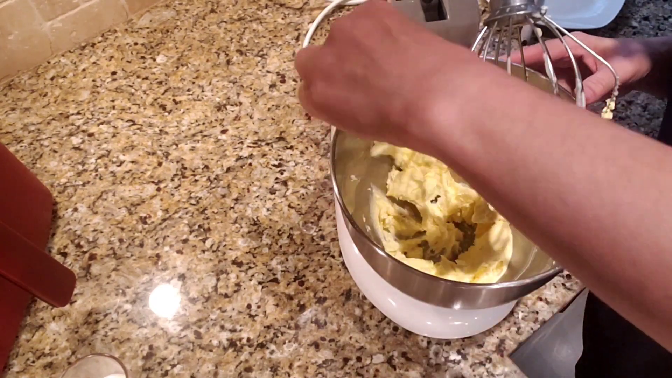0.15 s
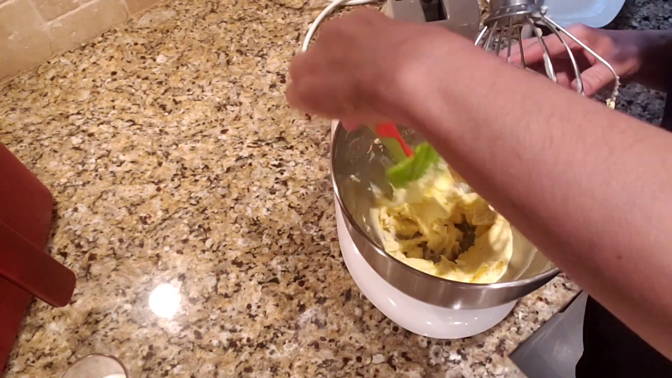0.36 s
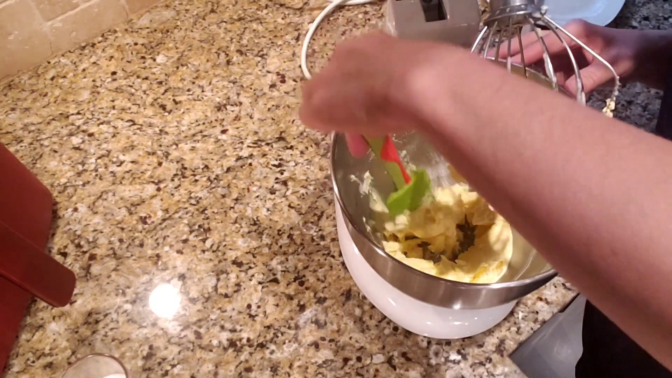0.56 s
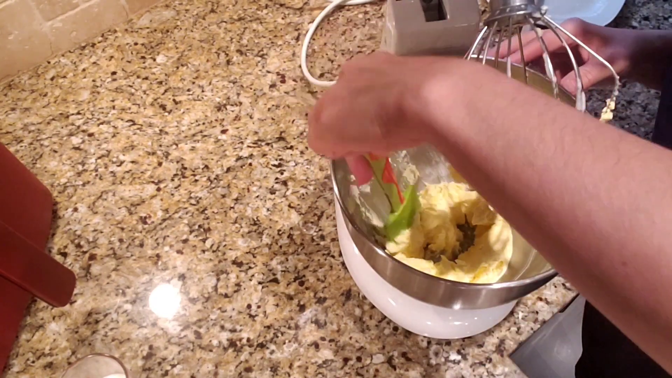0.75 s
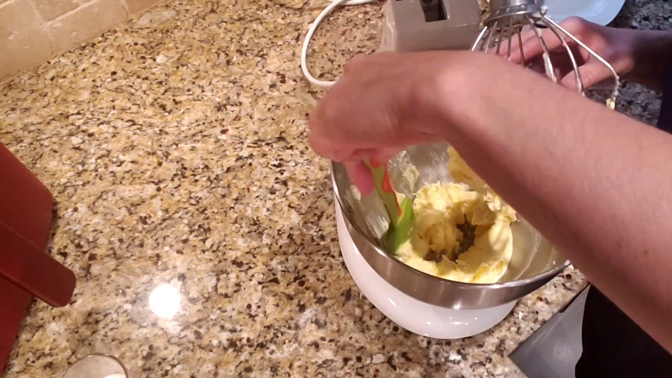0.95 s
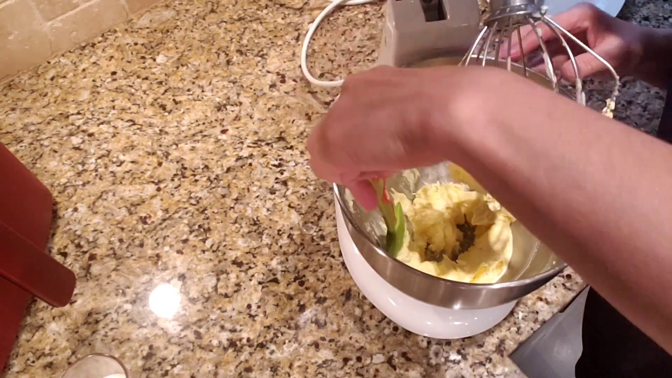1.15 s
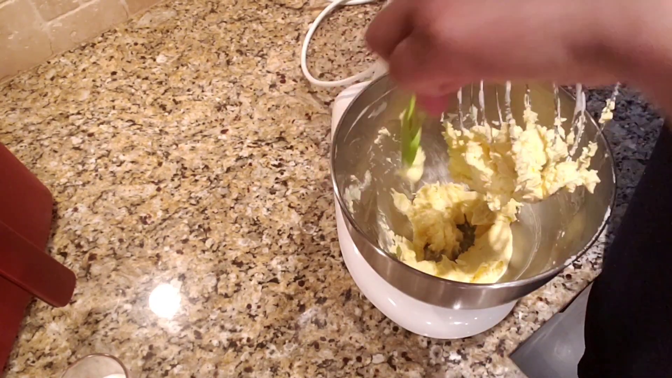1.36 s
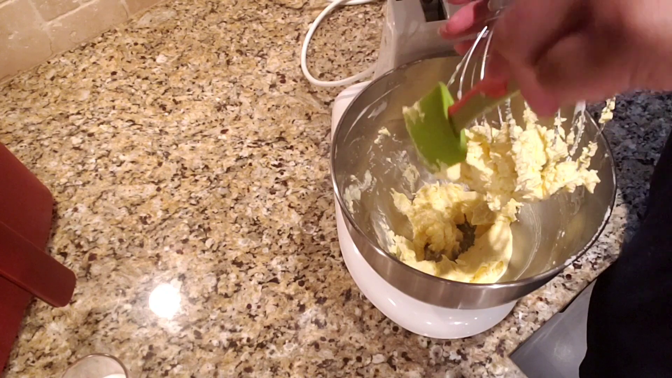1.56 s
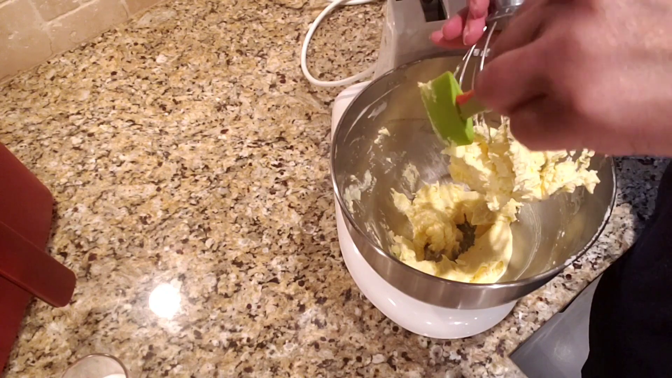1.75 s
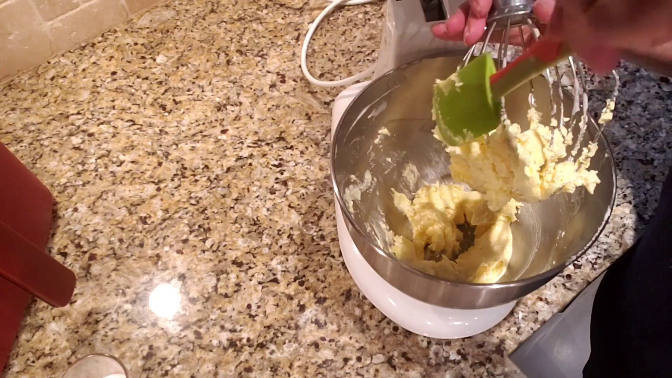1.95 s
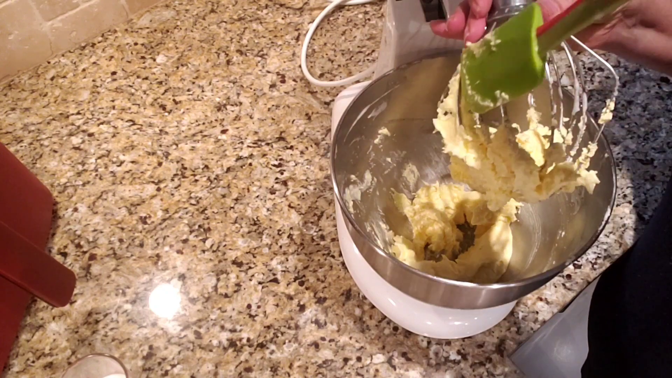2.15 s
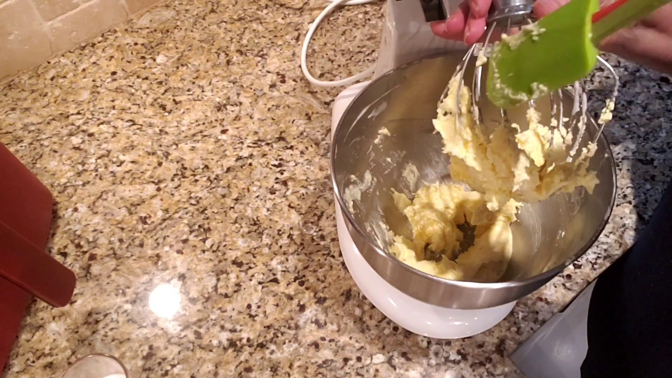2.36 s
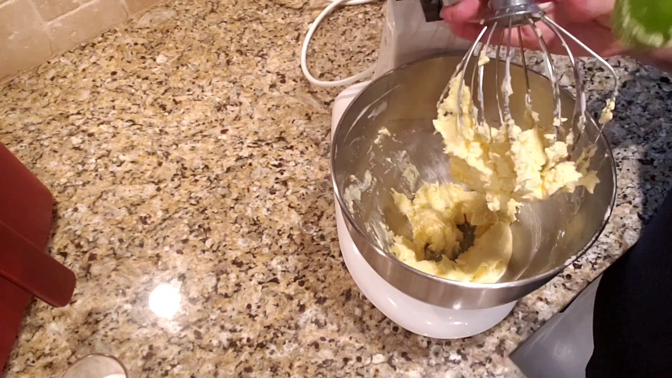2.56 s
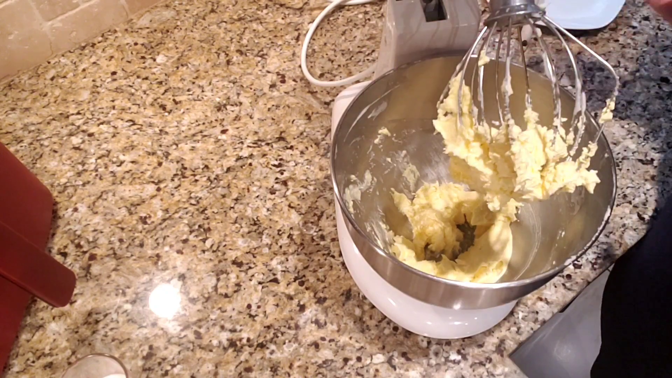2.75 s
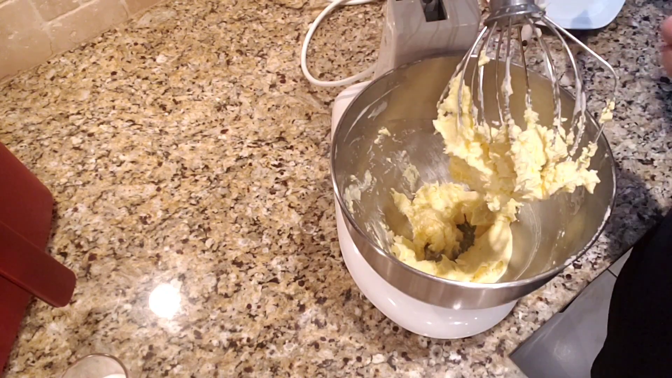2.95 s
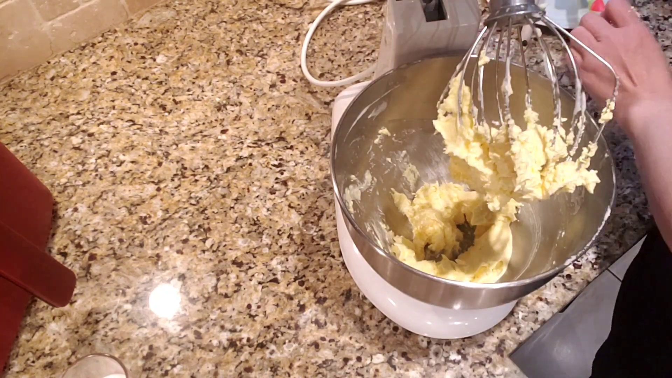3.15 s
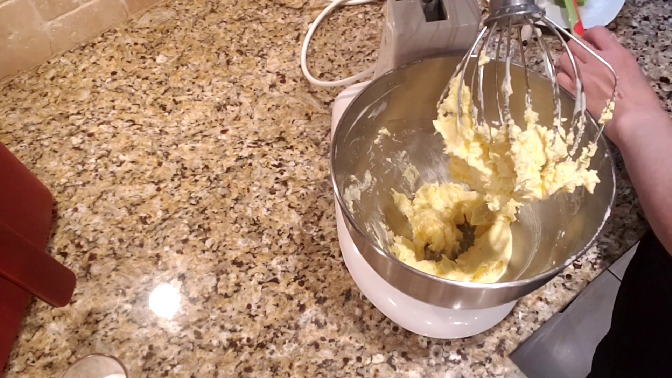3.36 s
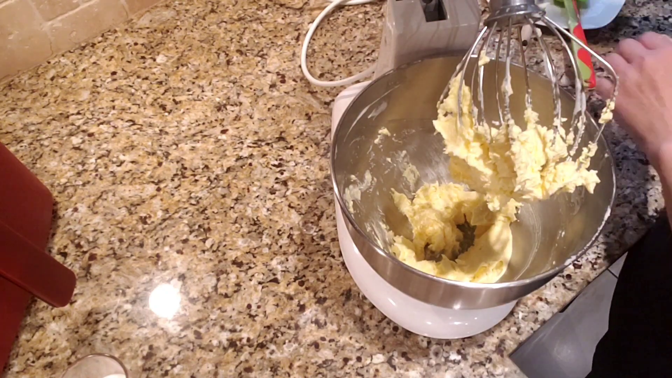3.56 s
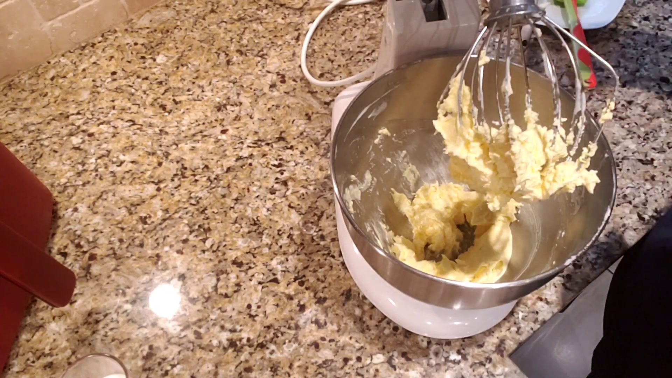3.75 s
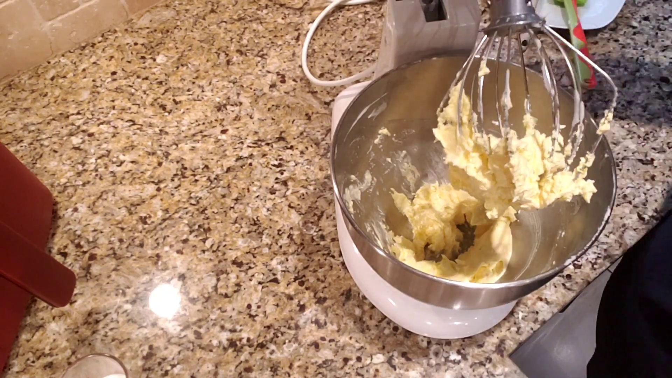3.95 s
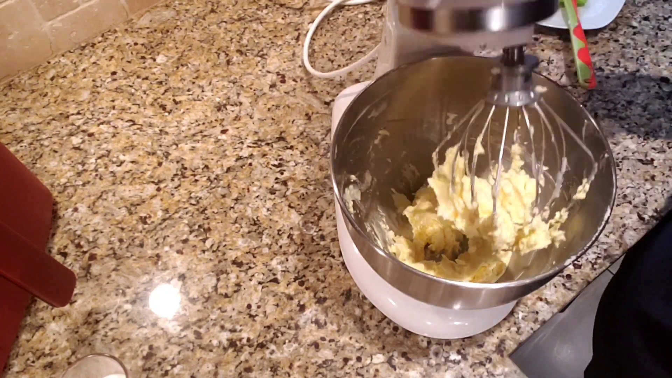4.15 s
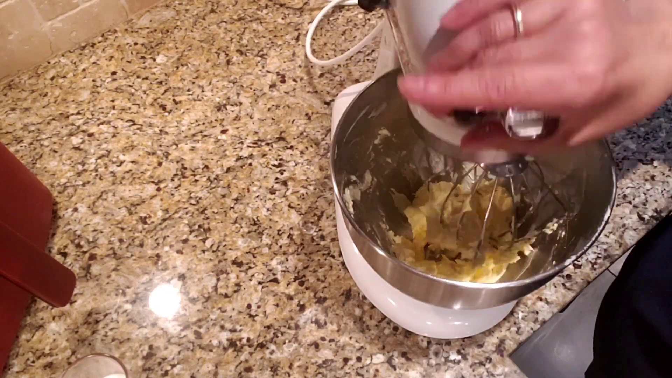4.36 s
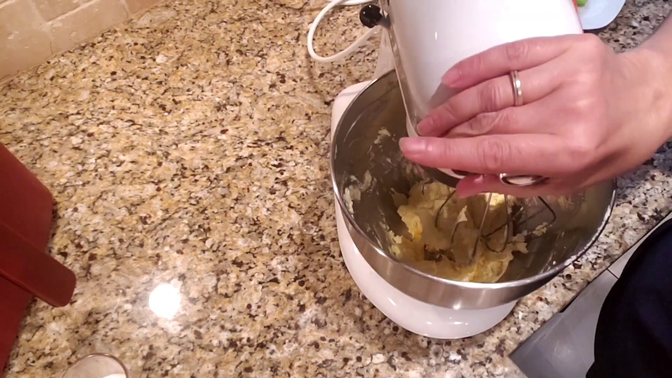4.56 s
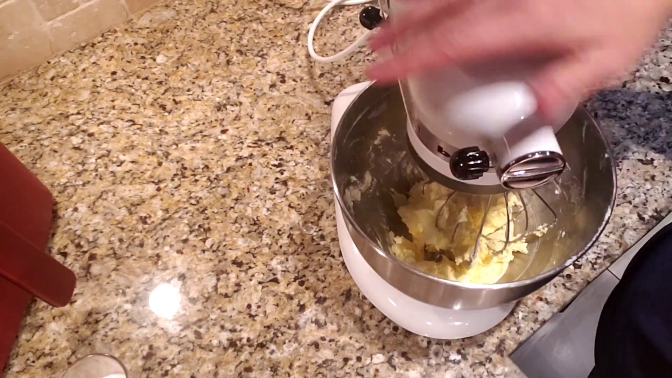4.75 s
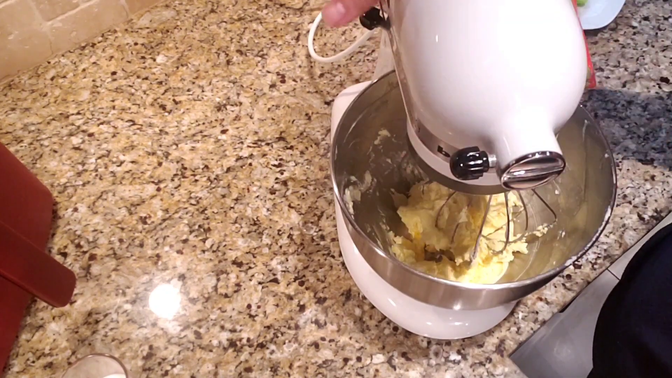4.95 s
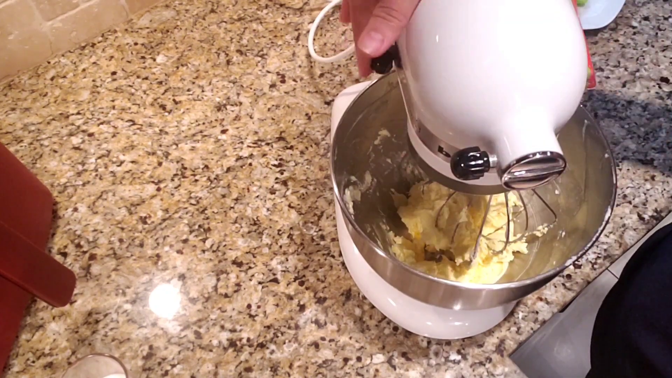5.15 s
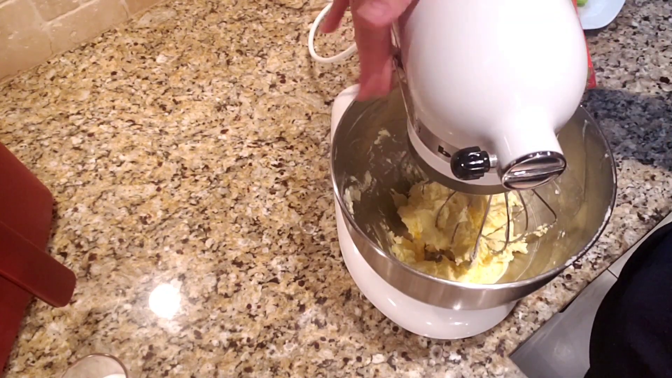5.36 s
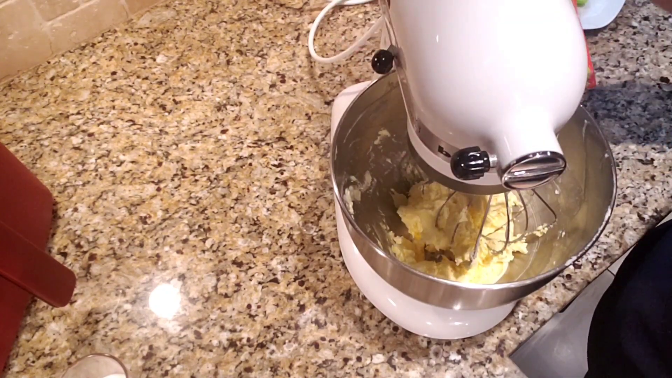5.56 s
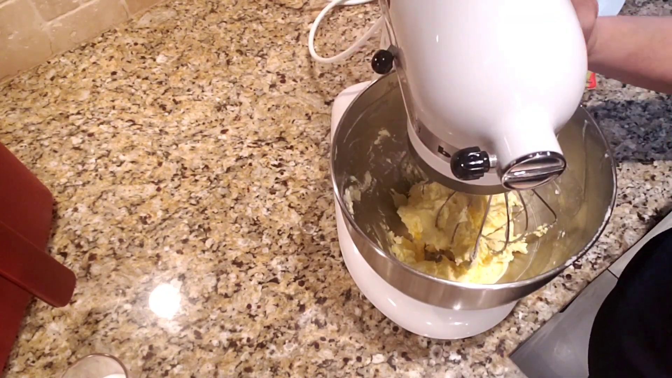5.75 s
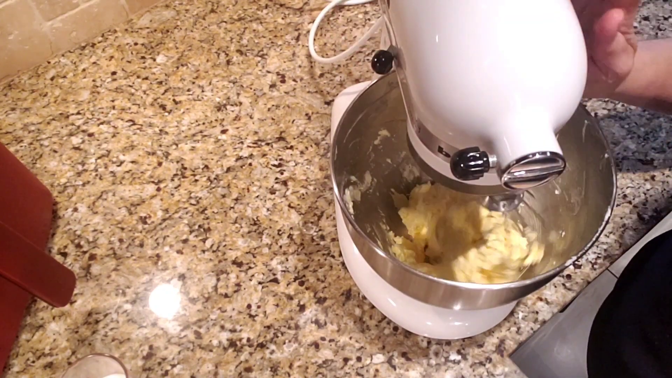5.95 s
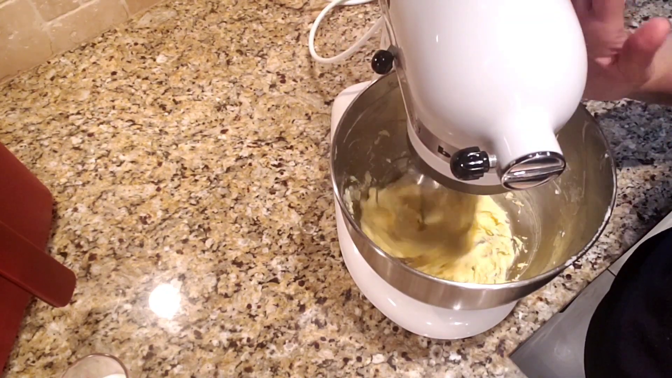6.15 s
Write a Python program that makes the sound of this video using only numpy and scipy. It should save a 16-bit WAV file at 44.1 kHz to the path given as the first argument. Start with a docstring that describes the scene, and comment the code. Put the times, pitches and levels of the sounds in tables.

```python
"""A spatula's friction scrapes butter round a resonant steel bowl in a kitchen where a fridge hums throughout.
Hands brush as swells of soft friction noise, and the spatula handle clatters on a dish that rings in decaying modes.
The head of the stand mixer is tilted down: its hinge groans in short tones, it lands with two thumps that rock
the stand, and the lock lever clicks as noise bursts through narrow resonances. At last the speed lever is pushed;
the motor snaps on and runs up, its whine a rising series of shaft orders over the hiss of the gears."""
import sys
import numpy as np
from scipy import signal
from scipy.fft import rfft, irfft
from scipy.io import wavfile

SR = 44100
rng = np.random.default_rng(int(sys.argv[2]) if len(sys.argv) > 2 else 0)


def waveform_to_disk(signal):
    """Save audio, clipped to [-1, 1], as 16-bit WAV at the path in sys.argv[1]."""
    frames = np.transpose(np.atleast_2d(signal))
    scaled = np.clip(frames, -1, 1) * 32767
    samples = np.round(scaled).astype(np.int16)
    wavfile.write(sys.argv[1], SR, samples)


N = 277375
TIME = np.arange(N) / SR  # s
AFTER = TIME[:SR]  # time since a blow, s

# spectrum of smeared butter and brushing skin: f/Hz, relative level per Hz/dB
SMEAR_SPECTRUM = [(1000, -50), (3500, -18), (4600, -8.5), (5500, -5), (7000, 0.5), (8200, -5.5),
                  (9500, -7.5), (11500, -2.5), (13500, 2), (15000, -5)]
# resonances of the steel bowl: f/Hz, width/Hz, relative level/dB
BOWL_RESONANCES = [(1240, 94, 0), (1326, 35, 1), (1833, 56, 10.5), (2320, 35, -4), (2340, 330, -7.5),
                   (2820, 39, -18), (3300, 46, -9), (3680, 570, -23), (4270, 120, 7), (4960, 84, 11.5),
                   (5236, 38, 16), (5760, 50, -27), (5740, 130, 11.5), (6500, 490, 7), (7170, 99, 14),
                   (7960, 230, 8)]
# resonances of the motor housing: f/Hz, width/Hz, relative level/dB
HOUSING_RESONANCES = [(395, 43, -12), (644, 23, 0), (850, 36, -5), (1890, 80, 1), (2074, 34, 3),
                      (3280, 50, 9.5), (3450, 61, 8), (6400, 40, 7.5), (7070, 140, 3.5), (7340, 40, -5),
                      (8440, 46, -5)]


def spatula():
    """Sliding friction: the rubber edge rasps on steel while butter smears and tears; both excite the bowl."""
    # rasp of the edge: f/Hz, relative level per Hz/dB
    rasp_spectrum = [(300, -2), (700, -1.5), (1200, -2), (1900, -4.5), (3000, 2), (4500, -4.5), (7000, -5),
                     (15000, -34)]
    hiss_gain, rasp_gain, travel = strokes()

    rasp = colour(friction(slips_per_s=800, spread_db=2, smooth=0.55), rasp_spectrum)
    rasp = amp(-5) * rasp + resonate(rasp, BOWL_RESONANCES)
    rasp = unit(wall_echo(rasp, travel)) * rasp_gain

    hiss = colour(friction(slips_per_s=2500, spread_db=3, smooth=0.8), SMEAR_SPECTRUM)
    hiss = hiss + amp(-17) * resonate(hiss, BOWL_RESONANCES)
    hiss = unit(wall_echo(hiss, travel)) * hiss_gain

    unevenness = amp(1.3 * drift(65))
    return kitchen((rasp + hiss) * unevenness, wet_db=-9)


def strokes():
    """Contact force shapes friction: each stroke lands, presses through an arch, wipes the steel and lifts off."""
    # t/s, length/s, butter hiss level/dB, extra hiss on landing/dB, extra hiss from pressure in mid-stroke/dB,
    # edge rasp level at the end/dB, rise of the rasp through the stroke as the steel is wiped bare/dB
    stroke_table = [(0, 0.17, -49.5, -11, 6.5, -53.5, 33), (0.356, 0.12, -39.5, 9, 4, -47, 6),
                    (0.612, 0.09, -41.5, -4.5, 3.5, -48.5, 8.5), (0.852, 0.099, -47.5, 3.5, 4, -52.5, 9.5),
                    (1.057, 0.099, -44, 8.5, 1, -49, 8.5), (1.275, 0.077, -49.5, 8.5, 2, -48.5, 17)]
    touch_s, landing_s = 0.007, 0.041  # linear onset; decay constant of the landing
    lift_db_per_s = 332
    hiss, rasp, travel = np.zeros((3, N))
    for s, length, hiss_db, landing_db, press_db, rasp_db, wipe_db in stroke_table:
        along = np.minimum(AFTER / length, 1)
        lift_off = amp(-lift_db_per_s * np.maximum(AFTER - length, 0))
        contact = np.minimum(AFTER / touch_s, 1) * lift_off
        landing = landing_db * np.exp(-AFTER / landing_s)
        pressure = press_db * np.sin(np.pi * along)
        add(hiss, s, contact * amp(hiss_db + landing + pressure))
        add(rasp, s, contact * amp(rasp_db - wipe_db * (1 - along)))
        moved = np.minimum((TIME - s) / length, 1) ** 2
        travel = np.where(TIME >= s, moved, travel)
    return hiss, rasp, travel


def wall_echo(x, travel):
    """Comb filtering: two echoes across the bowl carve bands that sink as the spatula's travel lengthens the lag."""
    echo_s, lengthening, strength = 0.00325, 0.1, 0.7  # lag at the start, its growth as a share, gain per crossing
    lag = echo_s * (1 + lengthening * travel)
    out = x.copy()
    for crossing in (1, 2):
        delayed = [np.interp(TIME - crossing * lag, TIME, channel) for channel in x]
        out += strength ** crossing * np.array(delayed)
    return out


def head():
    """Impact of a heavy body: the head clacks on its stop, rings dully and rocks the mixer; the bowl is bumped."""
    # t/s, thud on the counter level/dB, ring of the head level/dB, clack level/dB, clack bandwidth/Hz
    knocks = [(1.062, -47.5, -51.5, -82, 1770), (1.277, -49.5, -58.5, -54.5, 1800),
              (4.05, -60, -68, -43.5, 1600), (4.066, -39, -39.5, -44, 850), (4.128, -50, -46.5, -68, 696),
              (4.184, -44, -56, -53, 2760), (4.347, -51, -47, -63, 1170), (4.533, -42.5, -40.5, -46, 1300),
              (4.685, -23.5, -28, -29.5, 624), (4.722, -28.5, -32.5, -45, 2050),
              (4.795, -27.5, -30.5, -48.5, 1508), (4.801, -20.5, -24.5, -31.5, 490),
              (4.882, -41, -50.5, -75, 1400), (4.938, -44, -64.5, -80, 600),
              (5.049, -47.5, -46.5, -74.5, 600)]
    # modes of the cast head: f/Hz, relative level/dB, t60/s
    head_modes = [(351.4, 1.5, 0.22), (370.7, 1.5, 0.24), (455, 2, 0.058), (532.4, -11.5, 0.25),
                  (670, -25.5, 0.29), (877, -14.5, 0.052), (912, -17, 0.24), (1555, -14, 0.05)]
    out = np.zeros((2, N))
    thud = rocking()
    casting = unit_attack(ring(head_modes) * (1 - np.exp(-AFTER / 0.00073)))
    for s, thud_db, ring_db, clack_db, width_hz in knocks:
        corner_hz = max(width_hz, 360)
        softness = [(100, -10), (350, 0), (corner_hz, -2), (2 * corner_hz, -17), (16000, -50)]
        rattle = burst(t60=0.046) * (1 - np.exp(-AFTER / 0.0089))
        clack = unit_attack(colour(rattle, softness))
        add(out, s, amp(thud_db) * thud)
        add(out, s, amp(ring_db) * kitchen(casting, wet_db=-10.5))
        add(out, s, amp(clack_db) * kitchen(clack, wet_db=-3.5))
    return out


def rocking(cycles=1.7):
    """Mass on a springy support: the stand swings on the counter, each mode building up over a cycle or so."""
    # f/Hz, relative level/dB, t60/s
    stand_modes = [(49.2, -2, 0.15), (74.4, -18.5, 0.32), (97.9, -1, 0.13), (122, -7.5, 0.076)]
    swing = sum(ring([mode]) * (1 - np.exp(-AFTER * mode[0] / cycles)) for mode in stand_modes)
    return unit_attack(swing, size=2205)


def hinge():
    """Stick-slip: short groans at the pitch of the mixer body, each a tone with a trace of its octave."""
    # t/s, level/dB, length/s, f/Hz
    groans = [(1.967, -48, 0.033, 365.5), (4.342, -36, 0.041, 376), (4.385, -50, 0.039, 363),
              (4.426, -41, 0.042, 367.5), (4.471, -53.5, 0.032, 375)]
    out = np.zeros((2, N))
    for s, db, length, hz in groans:
        t = TIME[:round(length * SR)]
        groan = np.sin(2 * np.pi * hz * t) + amp(-38) * np.sin(2 * np.pi * 2 * hz * t)
        swell = np.sin(np.pi * t / length)
        add(out, s, amp(db) * unit(groan * swell))
    return kitchen(out, wet_db=-10)


def clicks():
    """Hard impact: a broadband crack, and a brief rough ring as the rattle excites a set of resonances."""
    # t/s, resonance set, crack level/dB, ring level/dB, tilt of the crack at 400 Hz/dB, at 1.8 kHz/dB,
    # at 12 kHz/dB, t60 of the rattle/s
    # The first three are bowl ticks under the spatula: in the first, a light metal tick, and the second,
    # a bright one, the set's name only chooses the ring and names no struck part.
    click_table = [(0.228, "hinge", -56.5, -61.5, 9, -4, 1, .02),
                   (1.061, "whisk", -45.5, -45.5, -20, -23, -4, 0.016),
                   (1.276, "bowl", -54, -42.5, 2, -25, -10, 0.034),
                   (3.9922, "whisk", -41.5, -40.5, -2, -9, -6, 0.0073),
                   (3.999, "whisk", -45.5, -43, 8, 1, -13, 0.043),
                   (4.059, "hinge", -60, -46, 19, 8, -18, 0.087),
                   (4.185, "hinge", -54.5, -46.5, 0, 14, -32, .06),
                   (4.528, "hinge", -69.5, -58.5, 0, 11, -6, 0.4),
                   (4.632, "whisk", -50, -62, 15, 14, -10, 0.15),
                   (4.665, "whisk", -37, -38.5, 8.5, -1.5, -4.5, 0.16),
                   (4.666, "hinge", -60, -46.5, 3.5, -3, -14, 0.0187),
                   (4.797, "hinge", -58, -43.5, 5, 2.5, -29, 0.021),
                   (4.811, "whisk", -52.5, -53, -12, -12, -5, 0.023),
                   (5.049, "lock", -35.5, -37, -13, -3.5, 3, 0.011),
                   (5.052, "lock", -39, -33.5, -11, 4, -2, 0.11),
                   (5.257, "switch", -57.5, -66.5, -3.5, 6, -9.5, 0.078),
                   (5.288, "switch", -51, -62, -23, 8.5, -11, 0.11),
                   (5.309, "switch", -27, -30.5, -27.5, -1.5, -5.5, 0.11),
                   (5.342, "switch", -25.5, -22, -8, -4.5, 1.5, 0.01),
                   (5.346, "switch", -29.5, -29, 6, 5.5, 0.5, 0.04),
                   (5.408, "switch", -54.5, -44, 0, -7, 2, .024),
                   (5.467, "switch", -65, -57, -0.5, -7.5, -3, 0.034),
                   (6.066, "gears", -19, -36, -10, -12, -1.5, 0.026),
                   (6.084, "gears", -22, -27, -5, -17, -8.5, 0.076),
                   (6.104, "gears", -20, -25.5, -2, 4, 5.5, 0.012),
                   (6.12, "gears", -26, -42, -22, 10, -3, 0.038)]
    # crack of metal on metal: f/Hz, relative level per Hz/dB
    crack_spectrum = [(100, -12), (250, -13.5), (380, 15.5), (600, 3), (950, -4.5), (1700, 0), (3500, 1),
                      (5000, 0), (7000, 6.5), (9200, -2), (12500, 7.5), (15000, 3)]
    # resonances by set: f/Hz, width/Hz, relative level/dB
    named_resonances = {"whisk": [(3190, 90, -0.5), (3860, 200, -4), (6700, 250, 1.5), (7670, 170, -1)],
                        "hinge": [(1170, 430, -0.5), (1650, 270, -2), (3130, 650, -16)],
                        "lock": [(2230, 92, -5), (3940, 230, 3), (7500, 410, -2.5), (9530, 630, -5),
                        (11270, 170, 4.5)], "switch": [(1915, 160, -6), (2450, 150, -6.5),
                        (4270, 180, -3.5), (7330, 620, -3.5), (12960, 540, 2), (14340, 360, 3.5)]}
    all_sets = dict(named_resonances, bowl=BOWL_RESONANCES, gears=HOUSING_RESONANCES)
    out = np.zeros((2, N))
    for s, ring_set, crack_db, ring_db, body_db, clack_db, top_db, t60 in click_table:
        tone = [(400, body_db), (1800, clack_db), (4000, 0), (7500, 0), (12000, top_db)]
        crack = amp(crack_db) * unit_attack(colour(burst(t60), crack_spectrum, tone))
        rattle = burst(t60)
        rings = np.zeros_like(rattle)
        for hz, width, db in all_sets[ring_set]:
            narrow = resonate(rattle, [(hz, width, db)])
            rings += resonate(narrow, [(hz, 4 * width, 0)])  # steeper skirts
        add(out, s, kitchen(crack, wet_db=0.7))
        add(out, s, kitchen(amp(ring_db) * unit_attack(rings), wet_db=-7))
    return out


def dish():
    """Modal ringing: the spatula handle lands on a dish and bounces; the first blow sets the modes ringing."""
    # blows of the handle: t/s, level/dB
    blows = [(3.584, -26.5), (3.589, -28), (3.62, -35.5), (3.657, -49)]
    # modes of the dish: f/Hz, relative level/dB, t60/s
    dish_modes = [(754, -8, .15), (1680, -11, .2), (1841, -8, .2), (2113, -4, .55), (2230, -7, .4),
                  (3270, 0, .5), (3639, 1, .34), (3820, -5, .35), (4086, -6, .2), (4360, -1, .35),
                  (5625, 2.5, .2), (5655, -1, .36), (5782, -5, .2), (6860, -9, .27), (7600, -15, .3),
                  (8200, -19, .27), (9927, -17, .27), (10620, -22, .27), (11590, -17, .27),
                  (13510, -15, .17)]
    # spectrum of the noise burst in the clatter: f/Hz, relative level per Hz/dB
    clatter_spectrum = [(180, -37), (300, -19.5), (991, -12), (2100, 5.5), (2780, -6), (3220, 4),
                        (5010, -6), (5710, -16.5), (8880, -52), (14000, -40.5), (15000, -75)]
    out = np.zeros((2, N))
    # the handle damps the modes while it touches
    damped = ring([(hz, db, 0.025) for hz, db, t60 in dish_modes])
    for s, db in blows:
        buzz = signal.fftconvolve(burst(t60=0.0079), damped[None], axes=1)[:, :SR]
        noise = colour(burst(t60=0.07), clatter_spectrum)
        clatter = amp(-7.5) * unit_attack(noise) + amp(-6) * unit_attack(buzz)
        add(out, s, amp(db) * kitchen(clatter, wet_db=2.5))
    s, db = blows[0]
    out_of_step = np.array([[np.pi / 2], [0]])  # phase at the two microphones, rad
    ringing = unit_attack(ring(dish_modes, phase=out_of_step))
    add(out, s, amp(db) * ringing * (1 - np.exp(-AFTER / 0.0006)))
    return out


def motor():
    """Order excitation: gear hiss, tooth and commutator tones sweep the housing; rotor unbalance shakes the stand."""
    # shaft orders: multiple of the shaft rate, relative level/dB
    orders = [(4, -2.5), (6, -16), (8, -11), (9, 2), (11, 5), (20, -18), (22, 4), (24, 2.5), (32, -8),
              (48, -13)]
    # gear noise through the casing: f/Hz, relative level per Hz/dB
    casing_spectrum = [(120, -39), (200, -25), (277, -32), (357, -1.5), (512, -12.5), (624, -3),
                       (849, -6.5), (1570, -8), (1880, -6), (2330, -8.5), (5260, -11.5), (7020, -3),
                       (8570, -16.5), (14000, -6), (15000, -30)]
    # resonance of the stand under the rotor: f/Hz, width/Hz, relative level/dB
    stand_sway = [(104, 72, -0.5)]
    on_s, run_up_s, top_speed = 6.064, 0.123, 135  # start, time constant, shaft turns per s approached
    gear_db, gear_torque_db = -36, 8.5  # level running free, and its rise under full torque
    whine_db, whine_rise_s = -36.5, 0.019  # level ahead of the rise and housing
    shake_db = -30  # unbalance at top speed, ahead of the stand's resonance
    jolt_s, jolt_db = 6.09, -39  # the starting torque kicks the stand

    running = np.maximum(TIME - on_s, 0)
    torque = np.exp(-running / run_up_s)  # share of the starting torque
    speed = 1 - torque  # share of the top speed
    turns = np.cumsum(top_speed * speed) / SR

    mesh = 1 + 0.21 * np.cos(2 * np.pi * turns)  # once per shaft turn
    gears = colour(friction(slips_per_s=2700, spread_db=6, smooth=0.9) * mesh, casing_spectrum)
    gears = unit(gears + amp(-9.5) * resonate(gears, HOUSING_RESONANCES))
    gears = gears * amp(gear_db + gear_torque_db * torque) * (running > 0)

    backlash = 0.003 * drift(110)  # play between the teeth makes the whine stagger, turns
    whine = np.zeros(N)
    for order, db in orders:
        whine += amp(db + 2.5 * drift(40)) * np.sin(2 * np.pi * order * (turns + backlash))
    whine = whine / np.std(whine[running > 0]) * amp(whine_db)
    whine *= 1 - np.exp(-running / whine_rise_s)
    whine = amp(-4) * whine + amp(-1) * resonate(whine, HOUSING_RESONANCES)

    # centrifugal force grows with the square of the speed
    unbalance = amp(shake_db) * speed ** 2 * np.sqrt(2) * np.sin(2 * np.pi * turns)
    shake = resonate(resonate(unbalance, stand_sway), stand_sway)

    out = kitchen(gears, wet_db=3.5) + kitchen(whine, wet_db=-5) + shake
    add(out, jolt_s, amp(jolt_db) * rocking())
    return out


def hands():
    """Soft friction: skin and sleeve brush over the machine, each touch one smooth swell of noise."""
    # middle t/s, length/s, level/dB
    brushes = [(2.2, 0.11, -71), (2.876, 0.12, -67.5), (3.047, .12, -67), (3.215, 0.17, -60),
               (3.513, 0.11, -67.5), (3.88, 0.31, -56), (4.713, 0.15, -55), (4.89, 0.087, -56),
               (5.62, .2, -58.5), (5.935, .17, -64.5)]
    rub = unit(colour(friction(slips_per_s=5700, spread_db=-3, smooth=0.74), SMEAR_SPECTRUM))
    touch = sum(amp(db) * np.exp(-(2 * (TIME - s) / length) ** 2) for s, length, db in brushes)
    return kitchen(rub * touch, wet_db=-4)


def fridge():
    """Tonal and broadband noise: mains hum of the compressor over the low rush of its fan and a faint hiss."""
    # hum: f/Hz, level/dB
    hum_tones = [(59.6, -70.5), (120.03, -51.5), (240.06, -54.5), (248, -67.5), (299, -84.5),
                 (333.4, -65.5), (353, -67.5), (434, -76)]
    # fan rush and faint hiss: f/Hz, relative level per Hz/dB
    air_spectrum = [(20, -28), (45, -4), (65, 3.5), (130, -3.5), (175, -10.5), (240, 2), (290, -9),
                    (350, -0.5), (410, -11), (600, -12), (850, -33), (2000, -45.5), (7000, -44.5),
                    (15000, -59)]
    air_db = -51.5
    hum = np.zeros(N)
    for hz, db in hum_tones:
        wander = 0.08 * drift(4.2)  # phase, rad
        hum += amp(db) * unit(np.sin(2 * np.pi * (hz * TIME + rng.random()) + wander))
    return hum + amp(air_db) * unit(colour(rng.standard_normal((2, N)), air_spectrum))


def microphone_noise():
    """Self-noise: independent coloured random noise in each microphone."""
    # f/Hz, relative level per Hz/dB
    noise_spectrum = [(1000, 0), (3000, -0.5), (5000, -8), (6800, 4.5), (8500, -18.5), (10500, -7),
                      (13000, 4.5), (15000, 2.5)]
    noise_db = -70.5
    return amp(noise_db) * unit(colour(rng.standard_normal((2, N)), noise_spectrum))


def kitchen(x, wet_db, size=256):
    """Reverberation: direct sound plus dense decaying reflections from counter, walls and cupboards."""
    # f/Hz, t60/s
    room_decay = [(60, 0.69), (350, 0.51), (1000, 0.49), (3000, 0.54), (7000, 0.4), (11000, 0.37),
                  (15000, 0.28)]
    hz, t, z = signal.stft(rng.standard_normal((2, SR)), SR, nperseg=size)
    decay = amp(-60 * t / read(room_decay, hz)[:, None])
    tail = signal.istft(z * decay, SR, nperseg=size)[1][:, :SR]
    tail *= np.clip((AFTER - 0.002) / 0.0012, 0, 1)  # gap before the first reflections
    tail /= np.linalg.norm(tail[0])
    return x + amp(wet_db) * signal.fftconvolve(np.atleast_2d(x), tail, axes=1)[:, :x.shape[-1]]


def friction(slips_per_s, spread_db, smooth):
    """Random slip process: tiny slips of uneven size modulate noise over a smooth hiss."""
    slips = rng.random(N) < slips_per_s / SR
    size = amp(spread_db * np.minimum(rng.exponential(1, N), 4)) * slips
    return unit(rng.standard_normal((2, N)) * (unit(size) + smooth))


def burst(t60):
    """Exponentially decaying noise: the dense rattle of a contact, independent at both microphones."""
    return rng.standard_normal((2, SR)) * amp(-60 * AFTER / t60)


def ring(modes, phase=0):
    """Modal superposition: exponentially dying sines set off by one blow."""
    return sum(amp(db - 60 * AFTER / t60) * np.sin(2 * np.pi * hz * AFTER + phase) for hz, db, t60 in modes)


def resonate(x, modes):
    """Parallel one-pole complex resonators of given centre, width and gain."""
    out = np.zeros_like(x)
    for hz, width, db in modes:
        radius = np.exp(-np.pi * width / SR)
        pole = radius * np.exp(2j * np.pi * hz / SR)
        out += amp(db) * 2 * signal.lfilter([1 - radius], [1, -pole], x).real
    return out


def colour(x, *spectra, size=4096):
    """Minimum-phase filtering: a causal filter whose dB response is the sum of the spectra."""
    hz = np.fft.rfftfreq(size, 1 / SR)
    response_db = sum(read(points, hz) for points in spectra)
    cepstrum = irfft(np.log(amp(response_db)))
    cepstrum[1:size // 2] *= 2  # fold onto positive time
    cepstrum[size // 2 + 1:] = 0
    taps = irfft(np.exp(rfft(cepstrum)))
    return signal.oaconvolve(np.atleast_2d(x), taps[None], axes=1)[:, :x.shape[-1]]


def drift(hz):
    """Low-passed random fluctuation of rms 1, with a Gaussian roll-off about hz."""
    roll_off = np.exp(-(np.fft.rfftfreq(N, 1 / SR) / hz) ** 2)
    return unit(irfft(rfft(rng.standard_normal(N)) * roll_off, N))


def read(points, hz):
    """Linear interpolation of a table on a log-frequency axis."""
    f, value = np.transpose(points)
    return np.interp(np.log(hz + 1), np.log(f), value)


def amp(db):
    """Level in decibels to amplitude ratio."""
    return 10 ** (np.asarray(db) / 20)


def unit(x):
    """Normalisation to rms 1."""
    return x / np.sqrt(np.mean(x ** 2) + 1e-20)


def unit_attack(x, size=882):
    """Normalisation of a blow so that its first size samples have rms 1."""
    return x / np.sqrt(np.mean(x[..., :size] ** 2) + 1e-20)


def add(mix, s, sound):
    """Linear superposition of a sound on the mix from time s."""
    part = mix[..., max(round(s * SR), 0):][..., :sound.shape[-1]]
    part += sound[..., :part.shape[-1]]


def scene():
    """Superposition of all the sources, over the faint hiss of the microphones."""
    foreground = spatula() + head() + hinge() + clicks() + dish() + motor()
    return foreground + hands() + fridge() + microphone_noise()


def record(dry):
    """Mid-side stereo: two close microphones share their bass, the left mostly louder; then the band limits."""
    # level of the side signal: f/Hz, gain/dB
    side_gain = [(60, -13.5), (150, -12), (330, -12), (650, -3), (1200, 0), (15000, -0.5)]
    # microphone response: f/Hz, gain/dB
    low_cut = [(15, -39), (25, -39.5), (31, -10), (39, 0.5), (45, 1), (15000, -2.5)]
    # left against right: f/Hz, level difference/dB
    lean = [(60, 2.45), (300, 1.1), (700, 4.5), (1400, -1), (2800, 0.5), (5500, 4.5), (9500, -0.2),
            (14000, 0.7)]
    edge_hz = 14750
    mid = (dry[0] + dry[1]) / 2
    side = colour((dry[0] - dry[1]) / 2, side_gain)[0]
    left = colour(mid + side, low_cut, [(hz, db / 2) for hz, db in lean], size=16384)
    right = colour(mid - side, low_cut, [(hz, -db / 2) for hz, db in lean], size=16384)
    low_pass = signal.firwin(301, edge_hz, window=("kaiser", 8), fs=SR)
    return signal.oaconvolve(np.vstack([left, right]), low_pass[None], "same", axes=1)


dry = scene()
out = record(dry)
waveform_to_disk(out)
```